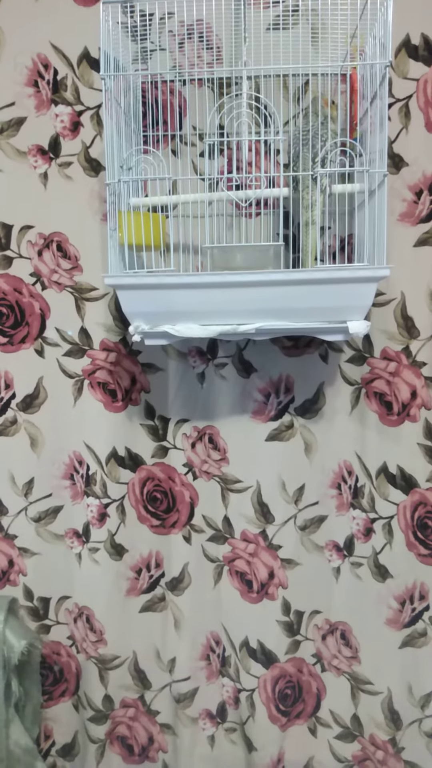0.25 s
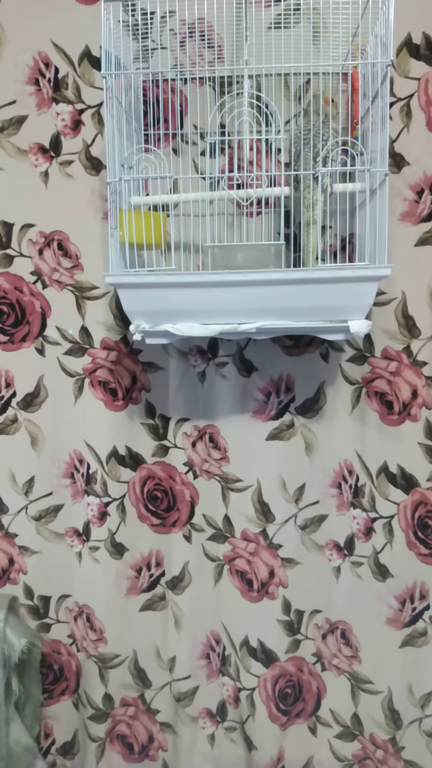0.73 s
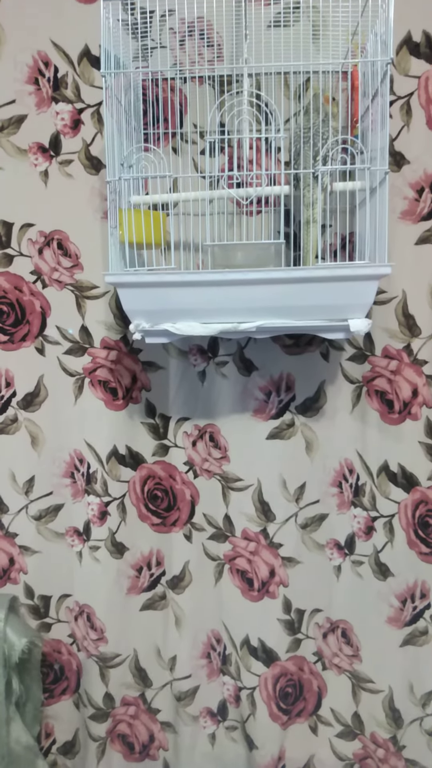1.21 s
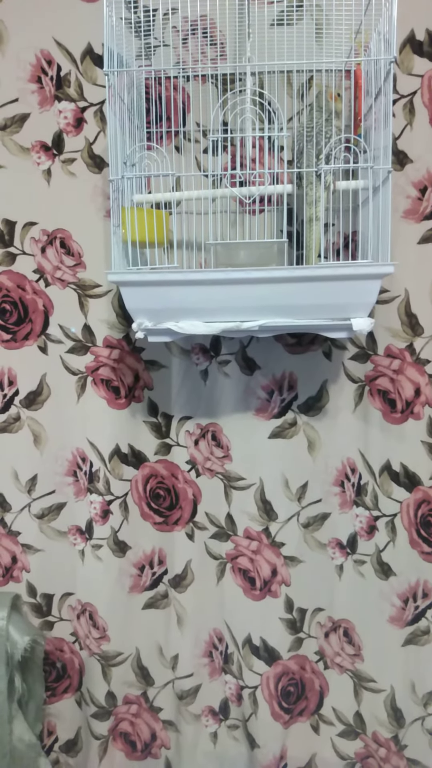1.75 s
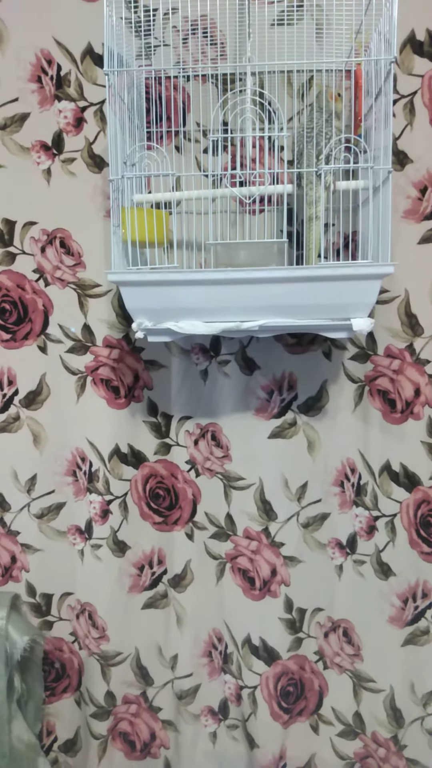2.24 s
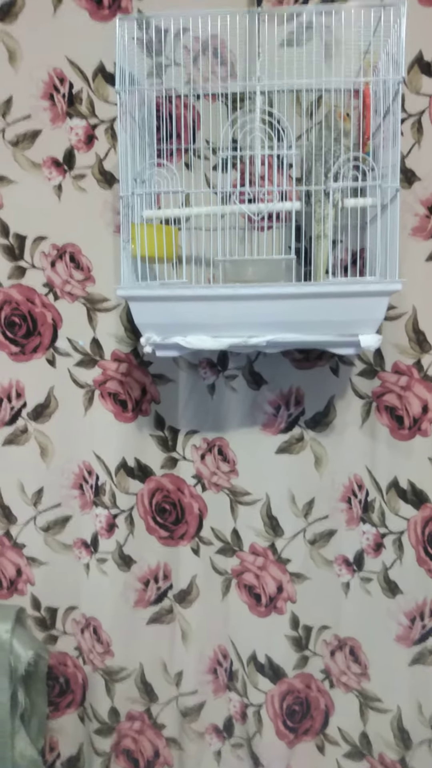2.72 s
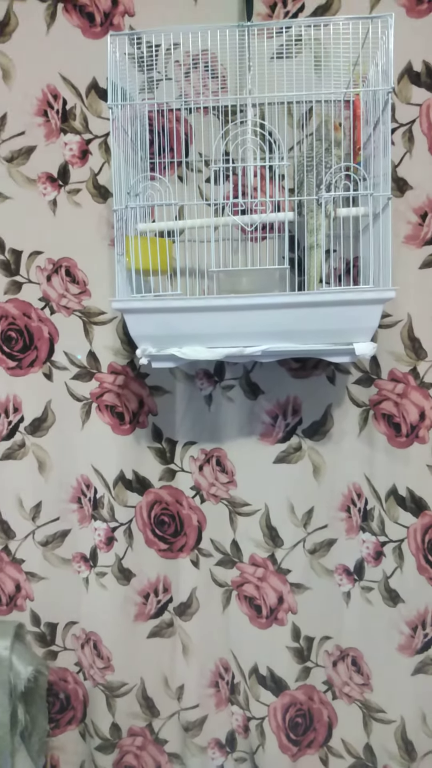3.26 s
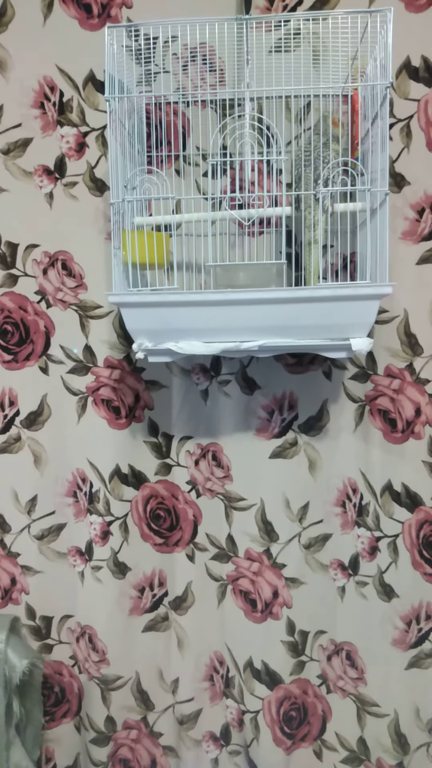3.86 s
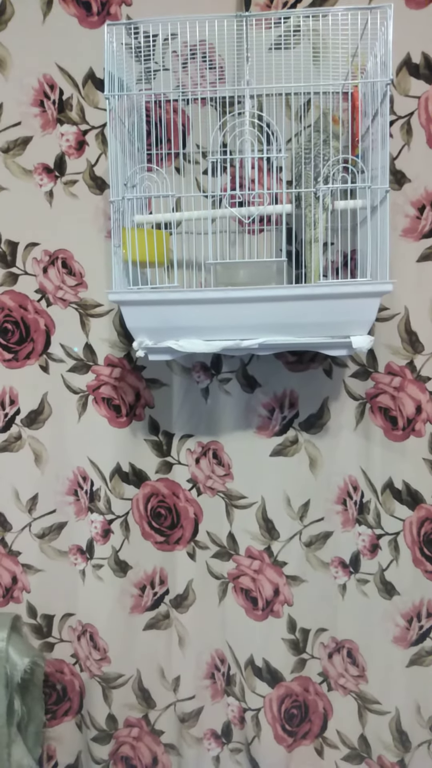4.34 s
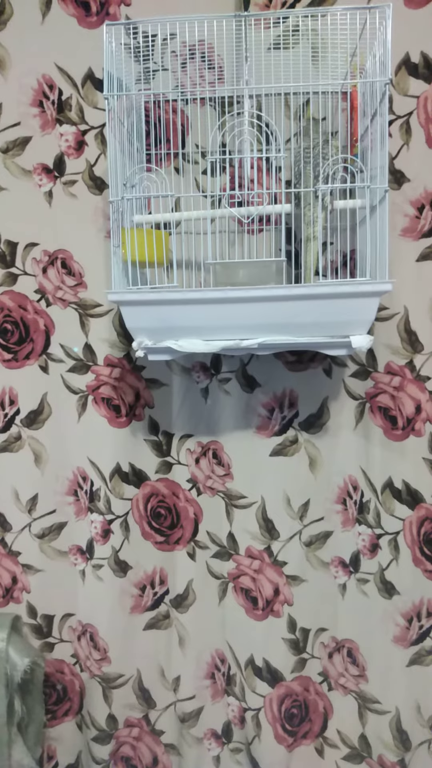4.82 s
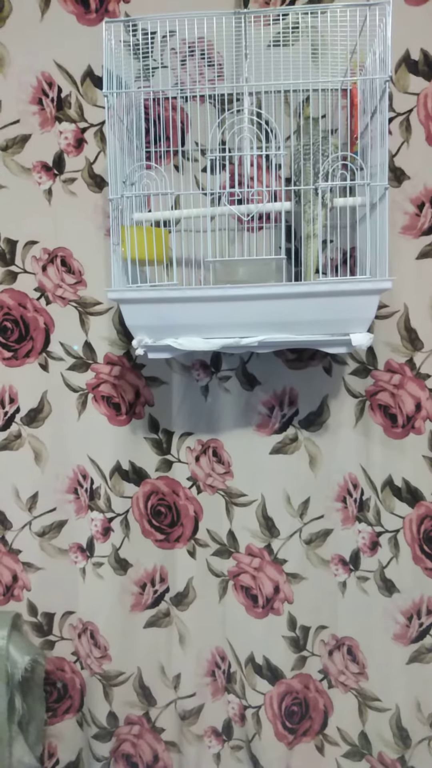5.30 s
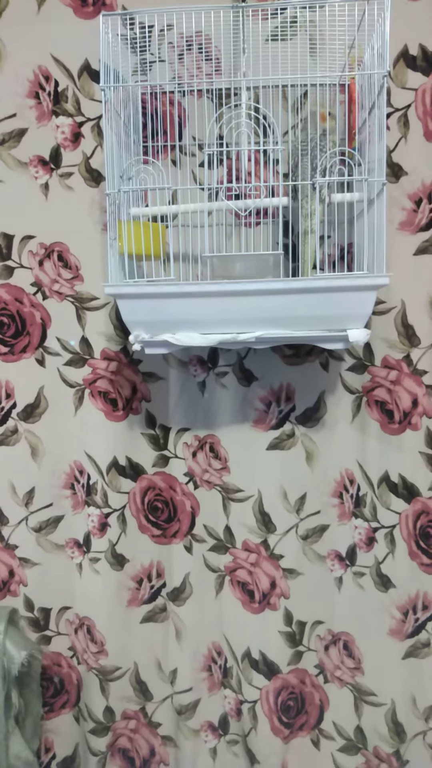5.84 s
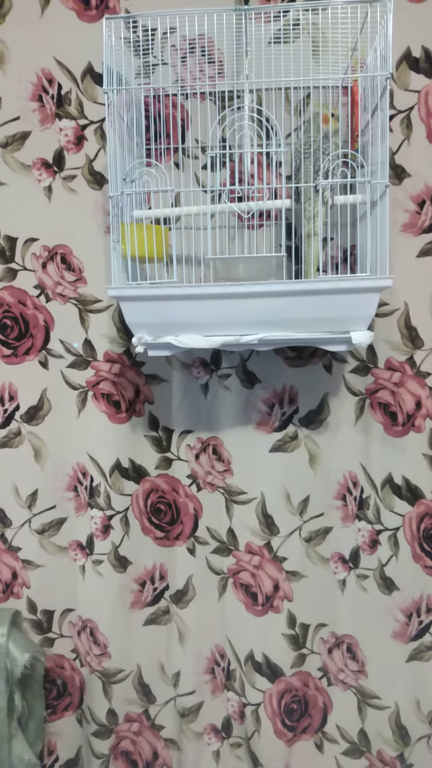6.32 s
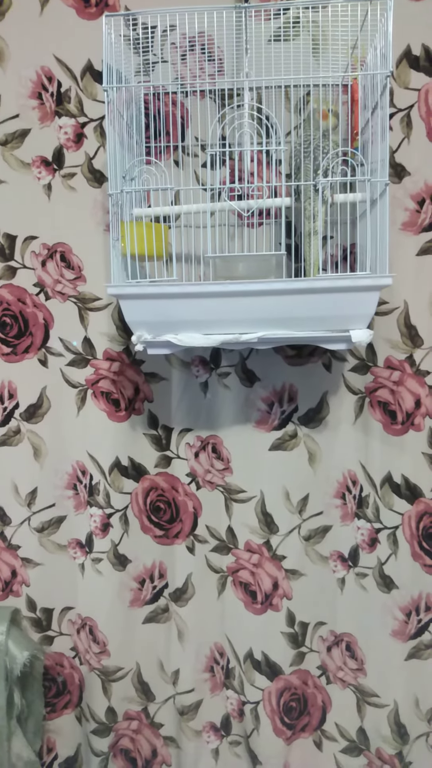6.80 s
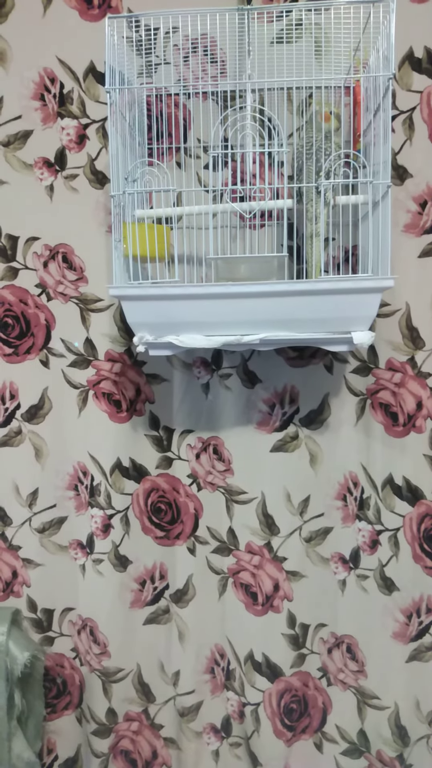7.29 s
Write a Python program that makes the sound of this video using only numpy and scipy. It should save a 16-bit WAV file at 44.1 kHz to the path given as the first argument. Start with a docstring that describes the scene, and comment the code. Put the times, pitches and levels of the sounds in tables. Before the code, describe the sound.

In a quiet room, a caged cockatiel hums, whistles up and down, screeches and clucks between pauses, with soft cage rustles.

```python
"""First come a cockatiel's nasal hums, with soft cage rustles and bumps over a faint house rumble.
A scratchy rasp, rising whistles, a long arched whistle, a harsh screech and short clucks follow.
Each call comes from a vibrating membrane in the bird's voice box (the syrinx), coloured by its
throat and beak. The quiet, bare-walled room rings on briefly after every call."""
import sys
import numpy as np
from scipy import signal
from scipy.fft import rfft, irfft, next_fast_len
from scipy.io import wavfile
from scipy.ndimage import uniform_filter1d

SR = 44100
rng = np.random.default_rng(int(sys.argv[2]) if len(sys.argv) > 2 else 0)


def file_out(sig):
    """Save sig as 16-bit WAV at sys.argv[1]."""
    # one column per channel
    cols = np.atleast_2d(sig).T
    # limit, then scale
    lim = np.clip(cols, -1, 1)
    pcm = np.round(lim * 32767).astype(np.int16)
    wavfile.write(sys.argv[1], SR, pcm)


N = 333396
TIME = np.arange(N) / SR
TOP_HZ = 15650  # upper limit of the treble


def undb(db):
    """Turn decibels into a number to multiply by."""
    return 10 ** (np.asarray(db) / 20)


def unit(x):
    """Scale a signal to an average power of 1."""
    return x / np.sqrt(np.mean(x ** 2))


def lookup(points, hz):
    """Read between (frequency, value) points, with every octave equally wide."""
    f, value = np.transpose(points)
    return np.interp(np.log(np.maximum(hz, 1)), np.log(f), value)


def noise(colour):
    """Noise of power 1, shaped by (frequency, level) points."""
    size = next_fast_len(N, True)
    gains = undb(lookup(colour, np.fft.rfftfreq(size, 1 / SR)))
    return unit(irfft(rfft(rng.standard_normal(size)) * gains, size)[:N])


def wobble(size, hz):
    """A random wiggle of about 1 either way, mostly slower than hz."""
    lowpass = signal.butter(2, min(hz, SR / 4), fs=SR, output="sos")
    return unit(signal.sosfilt(lowpass, rng.standard_normal(size + SR // 4)))[-size:]


def envelope(start, length, attack_s, release_s):
    """One note's samples, the time since it began, and an effort that rises and falls."""
    at = np.flatnonzero((TIME >= start) & (TIME < start + length))
    t = TIME[at] - start
    return at, t, np.clip(t / attack_s, 0, 1) * np.clip((length - t) / release_s, 0, 1)


def curves(rows):
    """The samples a table covers, a fade at both ends, and its columns joined into curves."""
    times, *columns = np.transpose(rows)
    at = np.flatnonzero((TIME >= times[0]) & (TIME <= times[-1]))
    fade = signal.windows.tukey(len(at), min(1, 256 / len(at)))
    return at, fade, [np.interp(TIME[at], times, column) for column in columns]


def stretches(rows, at, ramp_s=0.0029):
    """The depth of an effect that switches on and off between two times."""
    return sum(depth * np.clip(np.minimum(TIME[at] - start, end - TIME[at]) / ramp_s, 0, 1)
               for start, end, depth in rows)


# How the throat and beak favour some frequencies: f/Hz, level/dB
THROAT = [(600, -36), (1000, -16), (1350, -8), (1800, -6), (2200, -6), (2700, 0), (3300, 0), (4000, -3),
          (4700, 0), (5500, -2), (6600, -8), (7800, -25), (9300, -33), (11700, -25), (15000, -27)]
def syrinx(hz, overtone_db, slope_db, doubling):
    """A vibrating membrane: overtones start at overtone_db and drop slope_db each, then pass the throat."""
    harmonic = np.arange(1, 11)[:, None]
    membrane_db = np.where(harmonic > 1, overtone_db - slope_db * (harmonic - 2), 0)
    throat_db = lookup(THROAT, harmonic * uniform_filter1d(hz, size=64))
    gains = undb(membrane_db + throat_db) * (harmonic * hz < TOP_HZ)
    phase = 2 * np.pi * np.cumsum(hz) / SR
    tone = np.sum(gains * np.cos(harmonic * phase), axis=0) / np.sqrt(np.sum(gains ** 2, axis=0) / 2)
    # strong and weak swings in turn add tones halfway between the harmonics
    return tone + doubling * (np.cos(1.5 * phase) + np.cos(2.5 * phase) / 2)


# Colour of the swirling air in the voice box: f/Hz, level/dB
TURBULENCE = [(290, -61), (500, -33.5), (766, -40.5), (883, -31.5), (1210, -10), (1330, -9.5), (1450, -10),
              (1630, -2), (1770, -6), (2840, -17.5), (3370, 0.5), (4290, -4.5), (6570, -7.5), (8490, -30.5),
              (15000, -29.5)]
# The membrane is driven too hard and flutters: start t/s, end t/s, depth/share of the pitch
FLUTTER = [(1.942, 1.995, .095), (1.992, 2.074, .042), (2.81, 2.99, .06), (3.24, 3.254, .06),
           (3.263, 3.3, .04)]
# Every second swing of the membrane is weaker: start t/s, end t/s, depth/0-1
DOUBLING = [(2.17, 2.25, .16), (3.73, 3.87, .45), (4.37, 4.42, .15)]
def voice(at, hz, overtone_db, slope_db, rough, turbulence, jitter=.07, waver=.04, shimmer=0.61):
    """As roughness goes from 0 to 1, the membrane shakes in pitch and strength and breaks into rasp."""
    rough, size = np.clip(rough, 0, 1), len(at)
    shake = rough * (jitter * wobble(size, hz=849) + waver * wobble(size, hz=143))
    shake += stretches(FLUTTER, at) * wobble(size, hz=500)
    tone = syrinx(hz * (1 + shake), overtone_db, slope_db, stretches(DOUBLING, at))
    rasp = 0.88 * rough ** 1.5
    sound = np.sqrt(1 - rasp ** 2) * tone + rasp * turbulence[at]
    return sound * (1 + shimmer * rough * wobble(size, hz=400)) / np.sqrt(1 + (shimmer * rough) ** 2)


# Colour of the soft hiss in hums and cage rustles: f/Hz, level/dB
SOFT_HISS = [(1000, -24), (2700, -8), (4500, -19.5), (5400, 3), (6700, -7.5), (8000, -9), (10000, -18),
             (15000, -23)]
# Nasal hums and soft coos: t/s, length/s, start f/Hz, end f/Hz, level/dB,
# start overtones/dB, end overtones/dB, drop per overtone/dB, roughness/0-1
HUMS = [(-.012, 0.0656, 1344, 1358, -41.5, -12.5, 25, 3.5, 0.13),
        (0.124, 0.042, 1301, 1264, -42.5, 3, -23, 4.5, 0.27),
        (0.256, 0.2065, 1362, 1341, -43.5, 5, -12, 2.5, .2),
        (3.726, 0.128, 1218, 1245, -52, -18.5, -12, 25.5, 0.23),
        (4.114, 0.029, 1273, 1410, -35, -22, -47, 8, 0.25),
        (4.248, 0.1, 1204, 1285, -49.5, -21.5, -27.5, 0.5, 0.18),
        (4.343, 0.089, 1290, 1173, -50, -16, 9.5, 1, 0.29),
        (6.672, 0.042, 1324, 1271, -40.5, 4.5, -12, 4.5, 0.61),
        (6.778, 0.0764, 1306, 1136, -48, -28, -30, -1, 0.1),
        (6.876, 0.041, 1166, 1116, -46.5, -40, -38, 12, 0),
        (6.919, 0.12, 1101, 1098, -47, -43.5, -33, 1.5, 0.1),
        (7.055, .06, 1133, 1240, -58, -12, -31, 4, 0.2)]
def hums(air_db=-19, sag=0.04):
    """Reedy, nearly level notes: the pitch sags as effort fades, and the moving beak shifts the overtones."""
    out, turbulence, air = np.zeros(N), noise(TURBULENCE), undb(air_db) * noise(SOFT_HISS)
    waver = 0.034 * wobble(N, hz=25)  # sag and waver are shares of the pitch
    for start, length, from_hz, to_hz, db, from_db, to_db, slope_db, rough in HUMS:
        at, t, effort = envelope(start, length, attack_s=0.022, release_s=0.02)
        hz = np.interp(t, [0, length], [from_hz, to_hz]) * (1 - sag * (1 - effort) + rough * waver[at])
        overtone_db = np.interp(t, [0, length], [from_db, to_db])
        out[at] += undb(db) * effort * (voice(at, hz, overtone_db, slope_db, rough, turbulence) + air[at])
    return out


# Soft, high rustles: t/s, level/dB, rise/s, decay/s
RUSTLES = [(0, -54, 0.031, 0.039), (0.71, -60, 0.014, 0.02), (.875, -69, 0.0096, 0.011),
           (2.335, -57.5, 0.03, 0.012), (4.189, -58.5, 0.03, 0.031), (5.345, -67, 0.011, 0.033),
           (5.42, -68, 0.031, 0.12), (6.221, -68.5, 0.0044, 0.029), (6.349, -55.5, 0.0052, 0.012),
           (6.864, -55.5, 0.05, 0.043)]
def rustles(grain_db=5.5):
    """Short, grainy swishes from the cage."""
    swell = np.zeros(N)
    for start, db, rise, decay in RUSTLES:
        t = TIME - start
        swell += undb(db) * np.clip(t / rise, 0, 1) * np.exp(-np.maximum(t - rise, 0) / decay)
    return swell * noise(SOFT_HISS) * undb(grain_db * wobble(N, hz=200))


# Colour of the house's rumble and hiss: f/Hz, level/dB
HOUSE_NOISE = [(15, -34), (25, -3), (59, -7), (172, -14), (207, -16), (231, -11.5), (344, -19.5),
               (427, -16), (604, -19.5), (790, -20), (1150, -27), (1240, -22.5), (2130, -32), (4750, -33),
               (10000, -43), (15000, -53)]
# Strength of a hollow rush in the background: t/s, level/dB
HOLLOW_RUSH = [(0, -79.5), (2.7, -78.5), (4.15, -70.5), (5.6, -74), (6.3, -80), (7.0, -66), (7.5, -104)]
def house(steady_db=-64, lowest_hz=44, patchy_db=4):
    """The house rumbles and hisses faintly while a hollow rush comes and goes."""
    highpass = signal.butter(6, lowest_hz, "high", fs=SR, output="sos")
    steady = signal.sosfilt(highpass, noise(HOUSE_NOISE))
    rush = sum(noise([(hz / 2, -60), (hz, 0), (2 * hz, -60)]) * undb(patchy_db * wobble(N, hz=5.6))
               for hz in (380, 490, 660))
    rush_db = np.interp(TIME, *np.transpose(HOLLOW_RUSH))
    return undb(steady_db) * unit(steady) + undb(rush_db) * unit(rush)


# Short, scratchy calls: t/s, length/s, f/Hz, level/dB, roughness/0-1
RASPS = [(0.097, 0.056, 1335, -39.5, 0.79), (4.066, 0.094, 1321, -45, 0.83)]
def rasps(overtone_db=0, slope_db=2.5):
    """The membrane rattles without settling: a quick start and a slow fade."""
    out, turbulence = np.zeros(N), noise(TURBULENCE)
    for start, length, hz, db, rough in RASPS:
        at, _, effort = envelope(start, length, attack_s=0.0031, release_s=0.062)
        out[at] += undb(db) * effort * voice(at, hz, overtone_db, slope_db, rough, turbulence)
    return out


# Dull bumps: t/s, f/Hz, level/dB, decay/s
BUMPS = [(0.101, 276, -49, 0.0058), (0.595, 272, -47.5, 0.0072), (0.613, 200, -49.5, 0.0059),
         (1.066, 80, -53, 0.0083), (5.442, 60.5, -62, 0.055), (5.619, 54.64, -55.5, 0.027),
         (7.009, 52.86, -51, 0.016)]
def bumps():
    """Soft knocks, each a single low ring that dies almost at once."""
    out = np.zeros(N)
    for start, hz, db, decay in BUMPS:
        t = np.maximum(TIME - start, 0)
        out += undb(db) * 2 * t / decay * np.exp(-t / decay) * np.sin(2 * np.pi * hz * t)
    return out


# Colour of air passing through the open beak: f/Hz, level/dB
BEAK_AIR = [(1000, -19.5), (2700, -11), (5400, 1), (7000, -4), (9000, -5), (11500, -11.5), (15000, -20.5)]
# Upward slides: t/s, length/s, start f/Hz, end f/Hz, end level before the throat's boost/dB,
# swell/dB, overtones/dB, drop per overtone/dB, end roughness/0-1, air/dB
RISING_WHISTLES = [(1.329, .111, 1668, 3606, -27.5, 17, -18, 15, 0, -27),
                   (3.831, 0.062, 1263, 2227, -37, 5, -23, 11, 0, -46),
                   (6.544, .049, 1384, 2288, -16.5, 27.5, 0, 12.5, 0.09, -24)]
def rising_whistles(throat_hz=3170, width_hz=310, boost_db=10, start_rough=0.49, waver=.04):
    """Growing pressure lifts pitch and level together, and the rough start clears into a tone."""
    out, turbulence, air = np.zeros(N), noise(TURBULENCE), noise(BEAK_AIR)
    for start, length, from_hz, to_hz, db, swell_db, overtone_db, slope_db, rough, air_db in RISING_WHISTLES:
        at, t, fade = envelope(start, length, attack_s=0.0031, release_s=0.017)
        pressure = np.clip(t / length, 0, 1)
        slack = (1 - pressure) ** 1.5
        hz = from_hz + (to_hz - from_hz) * pressure
        hz *= 1 + waver * np.sqrt(slack) * wobble(len(at), hz=120)  # a slack membrane climbs unevenly
        # the whistle rings out as it crosses the throat's own pitch
        boost = undb(boost_db * np.exp(-((hz - throat_hz) / width_hz) ** 8))
        tone = voice(at, hz, overtone_db, slope_db, rough + start_rough * slack, turbulence)
        out[at] += fade * undb(db - swell_db * slack) * (boost * tone + undb(air_db) * air[at])
    return out


# Three sliding low tones, one list each: t/s, f/Hz, level/dB
LOW_TONES = [
    [(1.75, 462, -65.5), (1.81, 390.5, -56.5), (1.87, 388.5, -51.5), (1.93, 280, -57), (1.945, 282.4, -69)],
    [(1.815, 827, -59.5), (1.87, 644, -54), (1.91, 620, -51.5), (1.94, 568, -66), (1.975, 603, -51),
     (2.02, 697, -73)],
    [(1.79, 1174, -58.5), (1.82, 1065, -65.5), (1.88, 997, -56)],
]
def low_tones(waver=0.083):
    """Weak, unsteady tones under the start of the arched whistle."""
    out = np.zeros(N)
    for rows in LOW_TONES:
        at, fade, (hz, db) = curves(rows)
        hz *= 1 + waver * wobble(len(at), hz=161.3)
        out[at] += fade * undb(db) * np.sin(2 * np.pi * np.cumsum(hz) / SR)
    return out


def long_call(rows, overtone_db, brighten, slope_db, air_db, unsteady_db=3.5):
    """Voice plus air hissing through the beak; overtones gain brighten dB for each dB of level."""
    at, fade, (hz, db, rough) = curves(rows)
    tone = voice(at, hz, overtone_db + brighten * (db - np.mean(db)), slope_db, rough, noise(TURBULENCE))
    # the level is least steady halfway between a clear tone and a rasp
    flicker_db = unsteady_db * np.sqrt(np.clip(rough * (1 - rough), 0, 1)) * wobble(len(at), hz=70)
    out = np.zeros(N)
    out[at] = fade * undb(db + flicker_db) * (tone + undb(air_db) * noise(BEAK_AIR)[at])
    return out


# Path of the long whistle: t/s, f/Hz, level/dB, roughness/0-1
ARCHED_WHISTLE = [(1.805, 1587, -66.5, 0.54), (1.836, 1713, -52, 0.41), (1.858, 2076, -36, 0.21),
                  (1.895, 2450, -39.5, 0.25), (1.912, 2722, -23, 0.12), (1.927, 2683, -32.5, 0),
                  (1.932, 2993, -21, 0.08), (1.94, 3050, -15.5, 0.11), (1.947, 3240, -37, 0.2),
                  (1.993, 4574, -27.5, .1), (2.06, 4610, -28.5, 0), (2.075, 3530, -31.5, 0.08),
                  (2.088, 3170, -21.5, 0.05), (2.114, 2934, -35.5, 0.06), (2.13, 3203, -20, 0),
                  (2.17, 2696, -35, 0.22), (2.215, 2482, -28.5, 0.15), (2.265, 2123, -44, 0.39),
                  (2.34, 1934, -46.5, 0.14), (2.47, 1997, -66.5, 0.3)]
def arched_whistle():
    """An almost pure tone that climbs high and comes back down."""
    return long_call(ARCHED_WHISTLE, overtone_db=-23.5, brighten=-.05, slope_db=12.5, air_db=-36)


# Path of the screech: t/s, f/Hz, level/dB, roughness/0-1 (more counts as 1)
SCREECH = [(2.806, 1727, -51.5, 0.73), (2.822, 1677, -36, 1.11), (2.87, 1650, -39.5, 1.23),
           (2.99, 1653, -47.5, 1.02), (3.004, 1659, -28, 0.28), (3.026, 1514, -33, 0.05),
           (3.043, 1746, -32, 0.22), (3.07, 1584, -36.5, 0.43), (3.125, 1746, -35, 0.86),
           (3.17, 1698, -42.5, 1.1), (3.218, 1661, -35.5, 0.75), (3.23, 1722, -28, 0.1),
           (3.251, 2236, -29, 0.56), (3.259, 2310, -17, 0.03), (3.268, 2271, -26.5, .45),
           (3.292, 2322, -27.5, 0.26), (3.305, 2333, -52, 0)]
def screech():
    """A harsh, reedy call that catches on a pitch midway and breaks upward at the end."""
    return long_call(SCREECH, overtone_db=1.5, brighten=0.37, slope_db=1.2, air_db=-25.5)


# Short clucks: t/s, length/s, middle f/Hz, level/dB, overtones/dB, drop per overtone/dB, roughness/0-1
CLUCKS = [(3.954, 0.036, 1435, -32.5, 0, 19, 0.28), (4.5224, 0.0068, 1656, -31.5, -0.5, 0.5, 0.39),
          (4.674, .016, 1406, -43.5, -2.5, -1, 0.42), (4.8346, 0.0127, 1790, -41.5, -0.5, 3, 0.47),
          (4.981, 0.0202, 1449, -38.5, 5.5, 5, 0.63)]
def clucks(pitch_drop=0.254, beak_hz=9000):
    """The voice box snaps open for a rough instant and dies away, its pitch dropping fast."""
    out, turbulence = np.zeros(N), noise(TURBULENCE)
    for start, length, hz, db, overtone_db, slope_db, rough in CLUCKS:
        at, t, effort = envelope(start, length, attack_s=0.002, release_s=length)
        falling_hz = hz * (1 - pitch_drop * (t / length - .5))
        out[at] += undb(db) * effort ** 0.77 * voice(at, falling_hz, overtone_db, slope_db, rough, turbulence)
    # the beak stays nearly shut, which dulls the treble
    return signal.sosfilt(signal.butter(2, beak_hz, fs=SR, output="sos"), out)


# How long the room rings: f/Hz, time to fade by 60 dB/s
ROOM_RING = [(200, .26), (1500, .31), (3000, .335), (6000, .36), (14000, .3)]
def room(x, echo_db=-1, first_s=0.0023, build_s=0.0061, lumpy_db=3, lumpy_s=0.008):
    """The direct sound, then wall echoes: lumpy at first, merging into a tail that fades ever faster."""
    t, f = TIME[:SR], np.fft.rfftfreq(SR, 1 / SR)
    lumps = undb(lumpy_db * np.exp(-t / lumpy_s) * wobble(SR, hz=693.6))
    echoes = rfft(rng.standard_normal(SR) * lumps)
    tail = np.zeros(SR)
    for hz, ring_s in ROOM_RING:
        band = lookup([(centre, centre == hz) for centre, _ in ROOM_RING], f)
        tail += irfft(echoes * band, SR) * undb(-60 * (t / ring_s) ** 1.25)
    tail *= (t > first_s) * (1 - np.exp(-t / build_s))  # echoes take a moment to crowd in
    return x + undb(echo_db) * signal.fftconvolve(x, tail / np.sqrt(np.sum(tail ** 2)))[:N]


def scene():
    """The bird and its cage in the room; the calls carry almost nothing below 800 Hz."""
    calls = hums() + rasps() + rising_whistles() + arched_whistle() + screech() + clucks()
    bird = signal.sosfilt(signal.butter(4, 800, "high", fs=SR, output="sos"), calls)
    return (room(bird + rustles() + low_tones()) + house() + bumps())[None]


def record(dry, faint_db=-75, cut_db=-7):
    """Turn down faint frequency bands, which shortens quiet tails, then cut the highest treble."""
    _, _, spectrum = signal.stft(dry, nperseg=512, noverlap=384)
    power = uniform_filter1d(np.abs(spectrum) ** 2, size=7, axis=-2)  # smooth across frequency
    power = uniform_filter1d(power, size=3, axis=-1).clip(0)  # and across time
    faintness = 1 - power / (power + undb(faint_db) ** 2)
    _, quieted = signal.istft(spectrum * undb(cut_db * faintness), nperseg=512, noverlap=384)
    return signal.sosfilt(signal.ellip(10, .2, 70, TOP_HZ, fs=SR, output="sos"), quieted[..., :N])


dry = scene()
out = record(dry)
file_out(out)
```